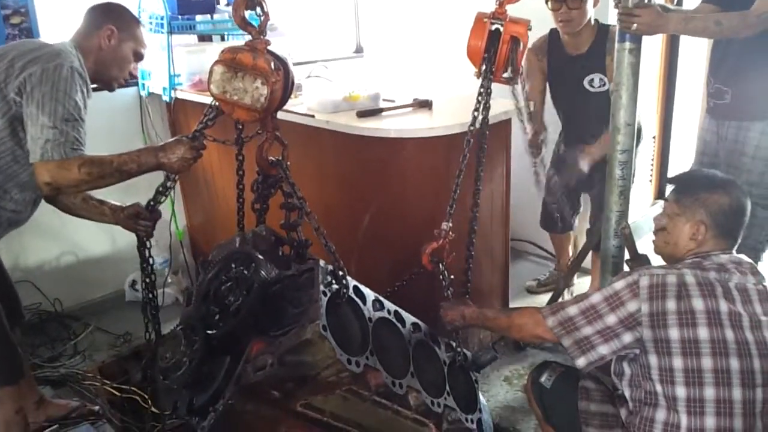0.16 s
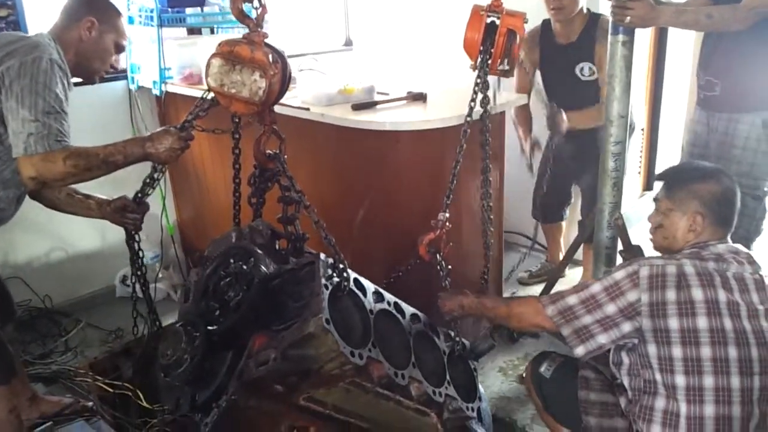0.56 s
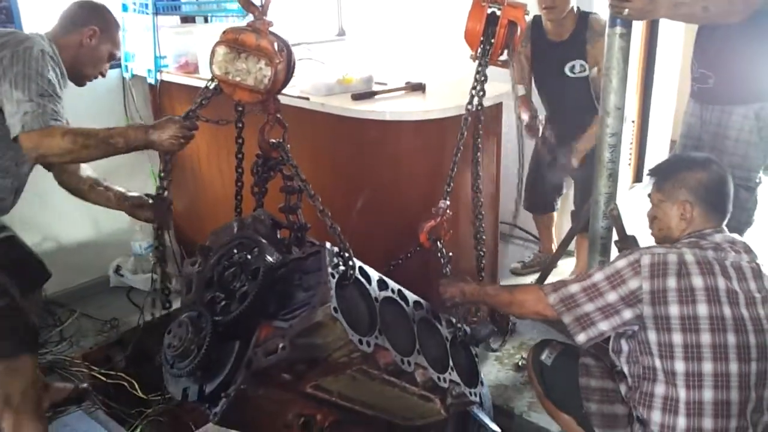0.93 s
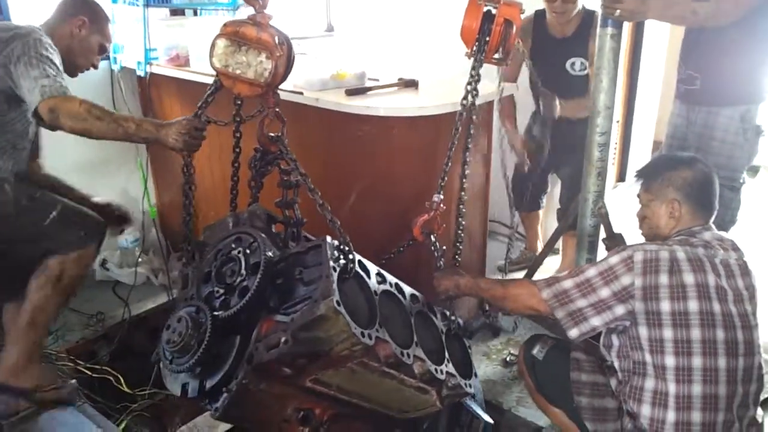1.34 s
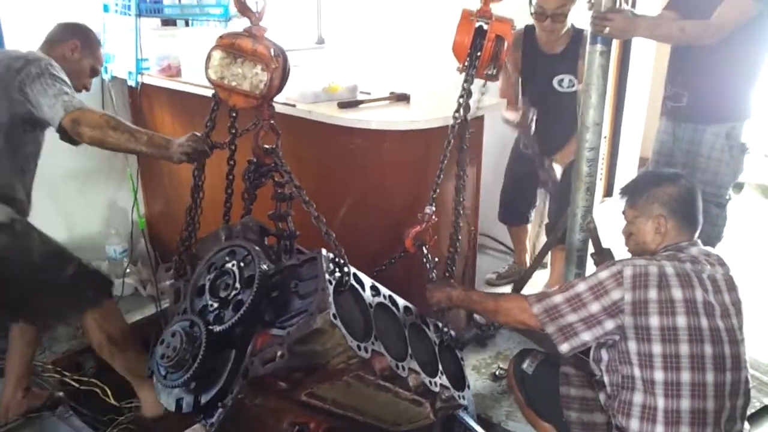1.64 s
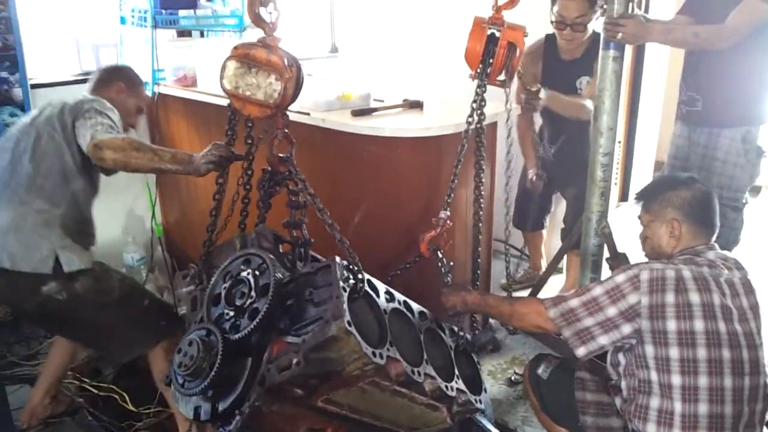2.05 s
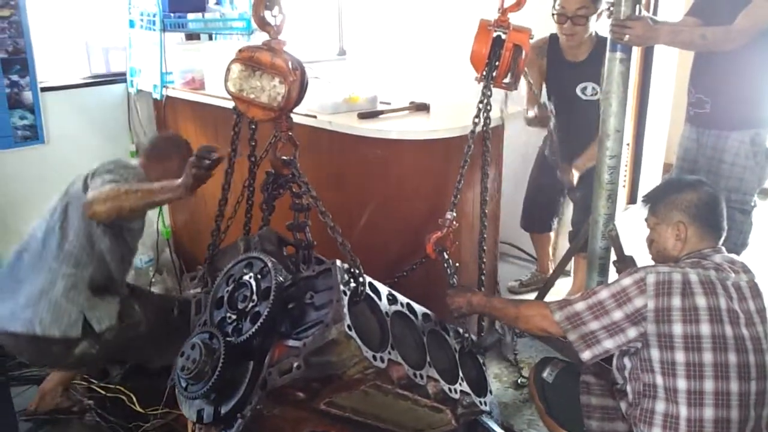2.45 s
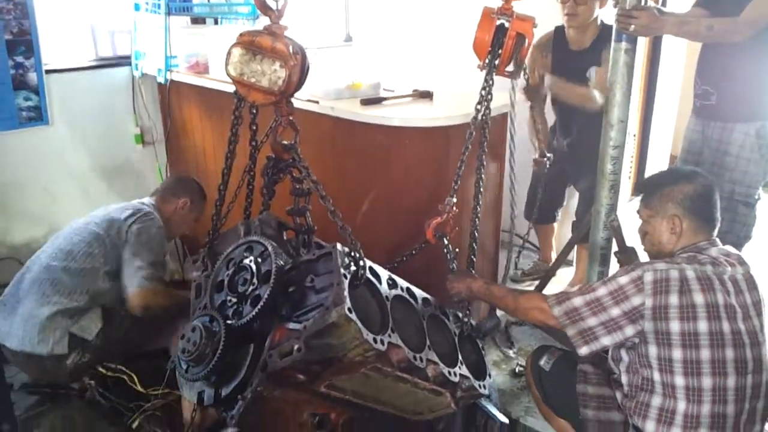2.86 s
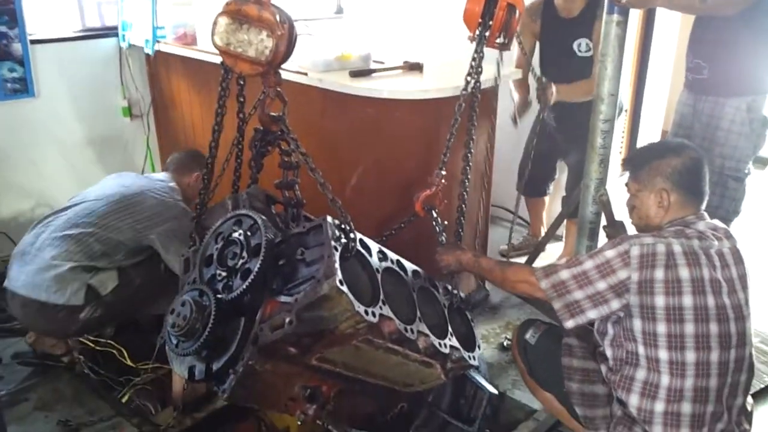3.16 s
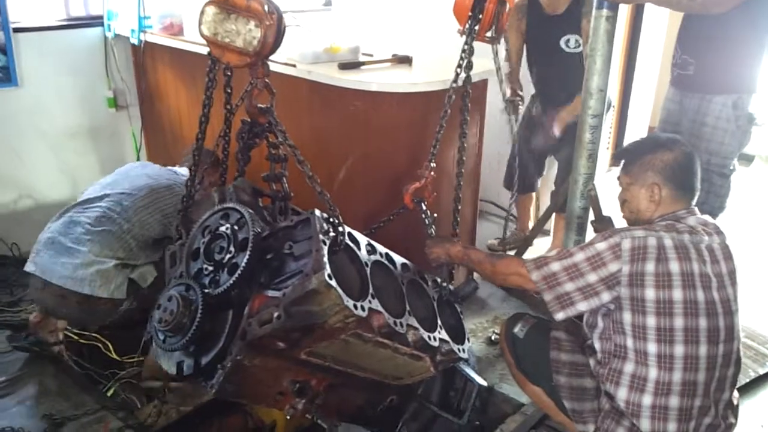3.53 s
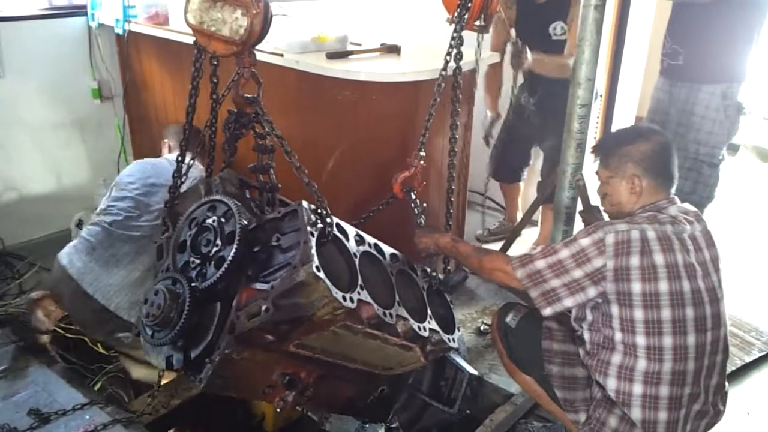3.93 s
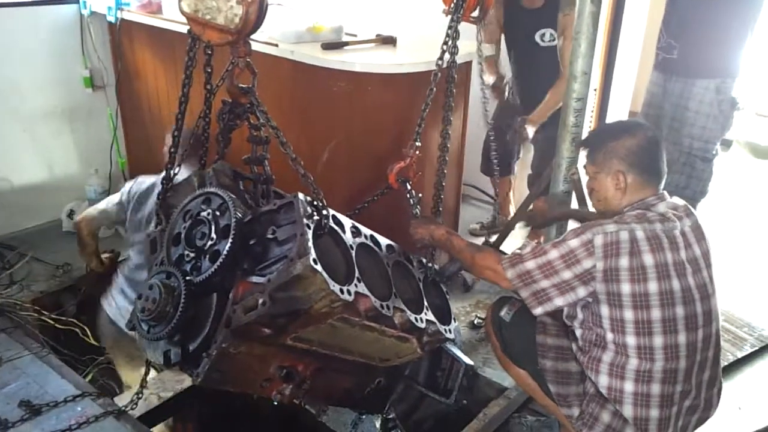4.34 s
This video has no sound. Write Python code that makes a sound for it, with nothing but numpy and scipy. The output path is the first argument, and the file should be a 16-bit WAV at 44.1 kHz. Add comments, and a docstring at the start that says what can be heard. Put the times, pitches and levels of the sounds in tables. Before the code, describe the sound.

Two hand chain hoists rattle loudly, ratchets clicking fast and chains jingling in surging pulls, with sharp steel clanks in a hard-walled workshop.

```python
"""Two manual chain hoists lift an engine block in a small, hard-walled workshop, pulled hand over hand.
From the first pull hand chains jingle, pawls rattle over ratchets and load chains clatter in their housings.
Links clank early on; a quick run of faint low thuds follows from 0.41 to 0.65 s, and clanks cluster at 1 s.
Further pulls swell in turn, with chinks, soft taps, thuds and singing steel, up to a strong last ratchet.
Steel contacts are noise cracks plus decaying sines with a room tail; thuds are low sines with noise."""
import sys
import numpy as np
from scipy import signal
from scipy.fft import rfft, irfft, next_fast_len
from scipy.io import wavfile
from scipy.ndimage import uniform_filter1d, minimum_filter1d

SR = 44100
rng = np.random.default_rng(int(sys.argv[2]) if len(sys.argv) > 2 else 0)


def dump_mix(stems):
    """Bounce the given channels to the path in sys.argv[1] as a 16-bit WAV at rate SR."""
    frames = np.atleast_2d(stems).T  # one column per channel
    limited = np.clip(frames, -1, 1)  # hard clip at full scale
    pcm = np.round(limited * 32767).astype(np.int16)
    wavfile.write(sys.argv[1], SR, pcm)


N = 198141

# Modes shared by hand chain links: freq_hz, relative_db, t60_s
LIGHT_LINK_MODES = [(6810, 2, .07), (6970, 2, .07), (7590, 6, .05), (8940, 2, .06), (9300, 5, .025),
                    (9480, 3, .05), (11700, 5, .04)]
# Jingle filter, also for chinks: freq_hz, gain_db
JINGLE_COLOUR = [(1200, -101), (2500, -10.5), (5000, -5), (5800, -10.5), (7500, -6), (7950, -6.5),
                 (8750, -5), (9300, -0.5), (9900, -3.5), (11800, -4.5), (12300, -10.5), (13800, -10.5),
                 (14500, -16)]
# Hand chain spurts or slackens: middle_s, length_s, change_db
CHAIN_SPURTS = [(0.424, 0.045, -2), (0.727, 0.09, 1.5), (0.94, 0.042, 2), (2.386, 0.15, 0),
                (3.223, 0.065, 1), (3.48, 0.1, -2), (3.634, 0.049, 1), (3.84, 0.1, -1.5), (4.17, 0.14, 2.5)]
JINGLE_COAST_DB = -16


def hand_chains():
    """Three light-link collisions per ratchet tooth; all links share a few modes, and the chain runs in spurts."""
    def strike():
        modes = LIGHT_LINK_MODES + link_modes(5500, 14000, t60=0.097, count=30)
        return contact(modes, ring_db=-5.5, crack_t60=0.021, room_db=6.0)

    spurt_db = sum(change_db * bell(s, length) for s, length, change_db in CHAIN_SPURTS)
    level_db = loudness(JINGLE_COAST_DB, arch=0.073, column=2) + spurt_db
    return rattle(3 * speed(), 0.45, 3.9, level_db, JINGLE_COLOUR, strike, count=24)


# Pawl and ratchet wheel modes, also in clanks: freq_hz, relative_db, t60_s
PAWL_MODES = [(3480, -5, 0.03), (3593, -5, 0.045), (3760, -3, 0.03), (4100, -3, 0.05), (4290, 0, 0.048),
              (4650, -2, 0.07), (4840, -4, 0.057), (4944, -5, .09), (5220, -11, 0.034), (7590, 13, 0.06),
              (9356, 4, 0.03)]
# First hoist's ratchet filter: freq_hz, gain_db
FIRST_RATCHET_COLOUR = [(450, -80), (1100, -47), (2100, -11.5), (2380, -19), (2900, -10.5), (3550, 5.5),
                        (3950, -0.5), (5000, -23), (7000, -45), (12000, -34)]
# Second hoist's ratchet filter: freq_hz, gain_db
SECOND_RATCHET_COLOUR = [(1500, -77), (3300, -27), (4200, -3), (5000, -0.5), (5600, -7), (7000, -19),
                         (12000, -18)]
FIRST_COAST_DB, SECOND_COAST_DB = -24.5, -20


def ratchets():
    """Each hoist's pawl drops off tooth after tooth; the second hoist runs faster and less evenly."""
    def first_drop():
        return contact(PAWL_MODES, ring_db=-2.5, crack_t60=0.026, room_db=-0.5)

    def second_drop():
        return contact(PAWL_MODES, ring_db=-10, crack_t60=0.016, room_db=0)

    first_db = loudness(FIRST_COAST_DB, arch=0.51, column=3)
    second_db = loudness(SECOND_COAST_DB, arch=0.18, column=4)
    first = rattle(speed(), 0.06, 3, first_db, FIRST_RATCHET_COLOUR, first_drop, count=16)
    second = rattle(1.8 * speed(), 0.3, 2.1, second_db, SECOND_RATCHET_COLOUR, second_drop, count=16)
    return first + second


# Housing modes, also in clanks: freq_hz, relative_db, t60_s
HOUSING_MODES = [(1260, -5, .08), (1480, -4, .08), (1590, -6, .08), (1615, -7, .22), (1830, -6, .3),
                 (1900, -3, .09), (1998, -3, .12), (2089, -7, .2), (2299, -9, .4), (2471, -5, .35),
                 (2610, -8, .3), (2907, -5, .25), (2972, -4, .3), (3095, -4, .2), (3596, -3, .15),
                 (4102, 6, .12)]
# Modes shared by load chain links: freq_hz, relative_db, t60_s
HEAVY_LINK_MODES = [(770, 5, .1), (990, 8, .1), (1125, 7, .1)]
# Clatter filter: freq_hz, gain_db
CLATTER_COLOUR = [(620, -80), (930, -18), (1080, -7), (1270, 0.5), (1480, 0), (1950, 3), (2380, -2.5),
                  (2520, -0.5), (3000, 0), (4000, -7), (8000, -56)]
# Low body filter: freq_hz, gain_db
BODY_COLOUR = [(370, -70), (470, -8), (550, 5), (760, 1), (900, 1), (1150, -0.5), (1500, -21), (2500, -50)]
# Short dips in the level of the clatter and its low body: middle_s, length_s, clatter_change_db, body_change_db
CLATTER_DIPS = [(0.322, 0.12, -4, -17), (0.958, 0.13, -4, -3.5), (1.35, 0.11, 0, -5.5),
                (1.762, 0.035, -3, -7), (2.04, 0.14, -2.5, -5.5), (2.224, 0.1, -2.5, -4),
                (2.674, 0.18, -2, -10), (2.835, 0.087, -4, -11), (3.19, 0.19, -5, -7.5),
                (3.598, 0.086, -5.5, -5), (3.774, 0.076, -5, -5)]
CLATTER_COAST_DB, BODY_COAST_DB, BODY_SWELL_DB = -24.5, -37, 4


def load_chains():
    """Heavy links tumble through the sheaves and ring the housings; clatter and low body dip briefly in level."""
    def housing_strike():
        return contact(HOUSING_MODES, ring_db=-10, crack_t60=0.022, room_db=1)

    def link_knock():
        modes = HEAVY_LINK_MODES + link_modes(507, 1313, t60=0.11)
        return contact(modes, ring_db=-1.5, crack_t60=0.072, room_db=8.5)

    dip_db, body_dip_db = sum(np.outer(dips_db, bell(s, length)) for s, length, *dips_db in CLATTER_DIPS)
    clatter_db = loudness(CLATTER_COAST_DB, arch=0.22, column=5) + dip_db
    body_db = BODY_COAST_DB + BODY_SWELL_DB * effort() + body_dip_db
    clatter = rattle(2 * speed(), 0.45, 2.9, clatter_db, CLATTER_COLOUR, housing_strike, count=12)
    body = rattle(speed(), 0.4, 2.9, body_db, BODY_COLOUR, link_knock, count=16)
    return clatter + body


# Links snapping taut: start_s, relative_db, low_body_gain_db
TAUT_CLANKS = [(0.159, 1, -5.5), (0.204, -9.5, 16), (0.655, -2.5, 0.5), (0.69, -6, -7), (0.8354, -4.5, 6),
               (1.002, -6, 3), (1.0657, 1.5, -6), (1.089, -16, -1), (1.1144, 0.5, -9), (1.2082, -9.5, 1),
               (1.5286, 0, -4.5), (1.797, -3.5, 1.5), (1.885, -3, -3), (1.9243, -5, 9), (2.315, -13.5, 17),
               (2.389, -0.5, -7), (2.7076, 0.5, -4.5), (2.727, -3.5, 0.5), (2.9396, -6, 14),
               (2.977, -10, 11), (3.309, -6, -4), (3.3895, -4, 2), (3.521, -3.5, 0), (3.6297, -6, -3),
               (3.899, 1, 0), (3.94, -1.5, -4)]
# Bright single link strikes: start_s, relative_db
LINK_CHINKS = [(0.011, -2), (0.489, -5), (0.679, 4), (0.72, -9), (0.7549, -6), (0.899, -11), (1.3045, -1),
               (1.524, 3), (2.1757, -3.5), (2.233, -3), (2.723, -2), (3.234, -10), (3.5587, -3),
               (3.6811, -6)]
# Clank filter: freq_hz, gain_db
CLANK_COLOUR = [(280, -74), (500, -13), (900, -5.5), (1400, 3), (2400, 1.5), (3600, 7), (5000, 0.5),
                (6000, -6.5), (14000, -34)]


def jerks():
    """Single loud contacts with weak bass: taut links clank, loose ones chink."""
    track = np.zeros((2, N))
    for s, db, body_db in TAUT_CLANKS:
        clank = contact(HOUSING_MODES + PAWL_MODES, ring_db=-8, crack_t60=0.065, room_db=3)
        clank = coloured(clank, CLANK_COLOUR)
        add(track, s, shaped(clank, [(2000, body_db), (3500, 0)]), db - 2.0)
    for s, db in LINK_CHINKS:
        chink = contact(link_modes(5500, 12000, t60=0.04), ring_db=-2, crack_t60=0.045, room_db=-1.5)
        add(track, s, coloured(chink, JINGLE_COLOUR), db + 4.0)
    return shaped(track, [(380, -19), (580, -0.5)])


# Wheel or housing resonances: start_s, end_s, relative_db, first_hz, last_hz
SINGING_RUNS = [(0.142, 0.312, -18.5, 3620, 3506), (0.619, 0.784, -21, 3640, 3740),
                (0.661, 0.772, -21, 4740, 4660), (0.9, 1.056, -18.5, 3820, 3590),
                (1.05, 1.176, -17, 3580, 3470), (2.195, 2.418, -24.5, 3830, 3610),
                (3.022, 3.315, -24, 5050, 4900), (3.081, 3.378, -23, 3630, 3620),
                (3.445, 3.53, -15.5, 3660, 3664), (3.528, 3.817, -24, 3630, 3610),
                (3.899, 4.297, -21, 4920, 4910), (3.891, 4.494, -22, 3600, 3516),
                (0.6, 1.8, -32.5, 1836, 1843), (2.25, 4.4, -33, 1827, 1834),
                (3.02, 3.14, -27.5, 1820, 1830), (1.949, 3.15, -26, 7530, 7580)]
SINGING_T60_S = 0.1


def singing_wheels():
    """Teeth repeatedly strike one resonance of a wheel or housing, which swells, drifts in pitch and fades."""
    track = np.zeros((2, N + SR))
    for start, end, db, first_hz, last_hz in SINGING_RUNS:
        n = round((end - start) * SR)
        progress, t = np.linspace(0, 1, n), np.arange(n) / SR
        teeth = np.diff(np.floor(t * PULL_TEETH_PER_S), prepend=-1)
        blows = teeth * np.exp(2j * np.pi * rng.random((2, N))[:, :n])
        decay = amp(-60 * t / SINGING_T60_S)
        ring = signal.fftconvolve(blows, decay[None], axes=1)[:, :n]
        pitch_hz = first_hz + (last_hz - first_hz) * progress
        carrier = np.exp(2j * np.pi * np.cumsum(pitch_hz) / SR)
        swell = np.sqrt(4 * progress * (1 - progress))
        track[:, round(start * SR):][:, :n] += amp(db) * swell * unit((ring * carrier).real)
    return shaped(track[:, :N], [(600, -45), (1600, 0)])


# Taps on the chain guide: start_s, relative_db
GUIDE_TAPS = [(0.071, -14), (1.06, -16.5), (1.541, -13), (1.623, -15), (1.888, -20), (2.462, -18),
              (2.723, -14), (2.925, -18), (3.313, -17), (3.386, -23), (3.467, -12), (4.391, -13)]
# Guide mode: freq_hz, relative_db, t60_s
GUIDE_MODES = [(1620, 0, 0.2)]
PING_LEFT_MINUS_RIGHT_DB = 5


def pings():
    """A swinging chain taps one steel part, probably its guide: a short clear note, weighted to the left."""
    track = np.zeros((2, N))
    for s, db in GUIDE_TAPS:
        add(track, s, contact(GUIDE_MODES, ring_db=12, crack_t60=0.0055, room_db=-1.5), db)
    track *= amp(PING_LEFT_MINUS_RIGHT_DB * np.array([[0.5], [-0.5]]))
    return shaped(track, [(500, -45), (1200, 0)])


# Faint low pitched thuds: start_s, relative_db, pitch_hz
SINGLE_THUDS = [(0.13, -41, 452), (0.159, -30.5, 307), (0.205, -41, 483), (0.485, -45, 470),
                (0.578, -37.5, 494), (0.629, -31.5, 358), (0.67, -40, 496), (0.738, -36, 373),
                (0.835, -36.5, 240), (1.205, -42.5, 495), (1.445, -39, 424), (1.529, -43, 524),
                (1.672, -37.5, 400), (1.705, -34, 300), (1.793, -35.5, 382), (1.905, -39.5, 499),
                (2.035, -41, 401), (2.132, -36, 265), (2.29, -44, 410), (2.34, -41, 449), (2.408, -42, 384),
                (2.52, -45, 422), (2.98, -38, 363), (3.329, -42, 434), (3.495, -44, 458), (3.905, -42, 477),
                (3.95, -33.5, 343), (4.049, -39.5, 408), (4.055, -33.5, 264), (4.164, -43, 475),
                (4.251, -40.5, 397), (4.415, -40, 436)]
RUN_START_S, RUN_END_S, RUN_STEP_S = 0.41, 0.65, 0.019
RUN_RELATIVE_DB, RUN_MEAN_HZ = -33, 243.5


def thud_list():
    """Single thuds plus one quick run with randomly varied pitch: start_s, relative_db, pitch_hz."""
    run = []
    for s in np.arange(RUN_START_S, RUN_END_S, RUN_STEP_S):
        run.append((s, RUN_RELATIVE_DB, RUN_MEAN_HZ * (1 + 0.086 * rng.standard_normal())))
    return SINGLE_THUDS + run


# Thud filter: freq_hz, gain_db
THUD_COLOUR = [(140, -50), (215, -11.5), (330, -6), (480, 5), (900, 12.5), (2000, -33)]
THUD_NOISE_GAIN_DB = -4


def low_thuds():
    """Each thud is a soft-edged decaying sine, a quarter cycle apart at the ports, with noise around its pitch."""
    track, t = np.zeros((2, N)), np.arange(SR // 4) / SR
    envelope = (1 - np.exp(-t / 0.012)) * amp(-60 * t / 0.12)
    for s, db, hz in thud_list():
        tone = np.sin(2 * np.pi * hz * t + np.array([[0], [np.pi / 2]]))
        noise_colour = [(0.51 * hz, -35), (0.675 * hz, -5), (1.9 * hz, -4), (2.6 * hz, -18)]
        noise = coloured(rng.standard_normal((2, len(t))), noise_colour)
        add(track, s, (tone + amp(THUD_NOISE_GAIN_DB) * noise) * envelope, db + 9.0)
    return shaped(track, THUD_COLOUR)


def room_tone():
    """Faint air noise, filtered to be strongest near 1 kHz."""
    noise = rng.standard_normal((2, N))
    return amp(-88) * coloured(noise, [(20, -9), (200, -20), (1000, 8), (8000, -28)])


# Pulls, each lasting until the next: start_s, hardest_s, jingle_db, first_ratchet_db,
# second_ratchet_db, clatter_db (added in power to the coasting level)
HAND_PULLS = [(-0.06, 0.19, -15, -21.5, -17, -23), (0.441, 0.73, -14, -27, -19.5, -30),
              (0.93, 1.099, -16, -32, -18, -27), (1.318, 1.531, -16, -24, -19.5, -33),
              (1.763, 1.92, -15, -22, -17.5, -39), (2.067, 2.3, -16.5, -28, -20.5, -29.5),
              (2.582, 2.73, -17, -29, -23.5, -50), (2.939, 3.239, -15, -23.5, -18.5, -26),
              (3.509, 3.66, -14.5, -20.5, -18, -20), (3.858, 4.079, -13.5, -20.5, -20, -23.5),
              (4.255, 4.4, -14.5, -17.5, -18, -22.5)]
LAST_PULL_END_S = 4.7
COAST_TEETH_PER_S, PULL_TEETH_PER_S = 48, 64


def effort():
    """Each pull swells from 0 to 1 at its hardest moment and eases off until the other hand takes over."""
    moments = np.append(np.array(HAND_PULLS)[:, :2], LAST_PULL_END_S)
    phase = np.interp(np.arange(N) / SR, moments, np.arange(len(moments)) / 2)
    return np.abs(np.sin(np.pi * phase))


def speed():
    """Ratchet teeth per second: the wheels turn faster under the pull."""
    return COAST_TEETH_PER_S + (PULL_TEETH_PER_S - COAST_TEETH_PER_S) * effort()


def loudness(coast_db, arch, column):
    """Level in dB of coasting plus the current pull; a low arch takes hold at once and stays strong."""
    pulls = np.array(HAND_PULLS)
    current = np.searchsorted(pulls[1:, 0], np.arange(N) / SR)
    pull_gain = effort() ** arch * amp(pulls[current, column])
    return 20 * np.log10(np.hypot(amp(coast_db), pull_gain))


def bell(s, length):
    """A smooth hump from 0 to 1 and back, centred on s."""
    return np.exp(-(2 * (np.arange(N) / SR - s) / length) ** 2)


# Room decay: freq_hz, t60_s
ROOM_DECAY = [(200, 0.081), (1500, 0.45), (5000, 0.32), (14000, 0.13)]
DETUNE_SHARE = 0.004  # pitch deviation between struck spots


def contact(modes, ring_db, crack_t60, room_db):
    """One steel contact at two microphone ports: a noise crack, ringing modes and the room's answer."""
    t = np.arange(SR // 4) / SR
    hz, db, t60 = np.transpose(modes)[:, :, None]
    hz = hz * (1 + DETUNE_SHARE * rng.standard_normal(hz.shape))
    phase = rng.uniform(0, 2 * np.pi, (2, len(hz), 1))
    strength = amp(db + rng.normal(0, 4.2, (len(hz), 1)) - 60 * t / t60)
    ring = np.sum(strength * np.sin(2 * np.pi * hz * t + phase), axis=1)
    crack = rng.standard_normal((2, len(t))) * amp(-60 * t / crack_t60)
    direct = unit(crack) + amp(ring_db) * unit(ring)
    # room tail: noise decaying at its own rate in each band
    f, s, bands = signal.stft(rng.standard_normal((2, len(t))), SR, nperseg=256)
    decay = amp(-60 * s / along(ROOM_DECAY, f)[:, None])
    tail = signal.istft(bands * decay, SR, nperseg=256)[1]
    wet = signal.fftconvolve(direct, tail, axes=1)[:, :len(t)]
    return unit(unit(direct) + amp(room_db) * unit(wet))


def link_modes(lo_hz, hi_hz, t60, count=14):
    """Unrelated random pitches of a link."""
    return [(hz, 0, t60) for hz in rng.uniform(lo_hz, hi_hz, count)]


def rattle(rate, scatter, spread_db, level_db, spectrum, strike, count=12):
    """Contacts at a rate, scattered by a share of their spacing, dealt among several struck spots."""
    turns = np.cumsum(rate) / SR
    beats = np.arange(int(turns[-1]))
    scattered = (beats + scatter * rng.standard_normal(len(beats))) % turns[-1]
    at = np.searchsorted(turns, scattered)
    size = amp(spread_db * np.clip(rng.standard_normal(len(beats)), -2, 2))
    # hard and soft contacts share out the same pull
    size /= np.sqrt(uniform_filter1d(size ** 2, size=7))
    spot = rng.integers(count, size=len(beats))
    sound, lead = np.zeros((2, N)), SR // 10
    for k in range(count):
        train = np.bincount(at[spot == k], size[spot == k], N)
        # wrapped lead-in: steel already rings at the start
        train = np.pad(train, (lead, 0), mode="wrap")
        sound += signal.oaconvolve(train[None], strike(), axes=1)[:, lead:lead + N]
    return amp(level_db) * coloured(sound, spectrum)


def add(track, s, sound, db):
    """Lay a blow into the track, its peak scaled to db."""
    part = track[:, max(round(s * SR), 0):][:, :sound.shape[1]]
    part += amp(db) * sound[:, :part.shape[1]] / np.abs(sound).max()


def amp(db):
    """Decibels to gain."""
    return 10 ** (np.asarray(db) / 20)


def unit(x):
    """Scale each channel to rms 1."""
    return x / np.sqrt(np.mean(x ** 2, axis=-1, keepdims=True) + 1e-20)


def along(points, hz):
    """Interpolate (Hz, value) points on a log frequency axis."""
    f, v = np.transpose(points)
    return np.interp(np.log(hz + 1), np.log(f + 1), v)


def filtered(x, response):
    """Multiply the spectrum of x by a response of frequency."""
    n = x.shape[-1]
    m = next_fast_len(n + 4096)
    return irfft(rfft(x, m) * response(np.fft.rfftfreq(m, 1 / SR)), m)[..., :n]


def shaped(x, points):
    """Filter x by (Hz, dB) points."""
    return filtered(x, lambda hz: amp(along(points, hz)))


def coloured(x, spectrum):
    """Filter x by (Hz, dB) points, then scale to rms 1."""
    return unit(shaped(x, spectrum))


def limited(x, ceiling):
    """A fast limiter ducks each channel around its highest peaks."""
    needed = ceiling / np.maximum(np.abs(x), ceiling)
    return x * uniform_filter1d(minimum_filter1d(needed, size=65), size=65)


def scene():
    """Both hoists, the low thuds and the air around them."""
    hoists = hand_chains() + ratchets() + singing_wheels() + load_chains() + jerks() + pings()
    return hoists + low_thuds() + room_tone()


# Port balance, left favoured in the high treble: freq_hz, left_minus_right_db
PORT_BALANCE = [(250, 11), (500, 0.5), (1700, 0), (3000, -0.5), (4000, -2.5), (4900, -6), (5800, -4.5),
                (6700, 3.5), (7400, 5), (8500, 6), (9300, 13.5), (11500, 14), (14000, 13)]
# Stereo width: freq_hz, side_gain_db
SIDE_GAIN = [(60, 2), (200, 0), (600, 4.5), (1100, 2), (1900, -0.5), (4000, -0.5)]
TOP_HZ = 14500


def record(dry):
    """Two ports colour the sound differently; peaks are limited, then the band ends steeply."""
    def ports(hz):
        gains = amp(along(PORT_BALANCE, hz) * np.array([[0.5], [-0.5]]))
        return gains / np.sqrt(np.mean(gains ** 2, axis=0))

    mid = (dry[0] + dry[1]) / 2
    side = shaped((dry[0] - dry[1]) / 2, SIDE_GAIN)
    heard = filtered(np.array([mid + side, mid - side]), ports)
    bounded = np.clip(limited(heard, ceiling=1.0), -1, 1)
    return filtered(bounded, lambda hz: hz < TOP_HZ)


dry = scene()
out = record(dry)
dump_mix(out)
```